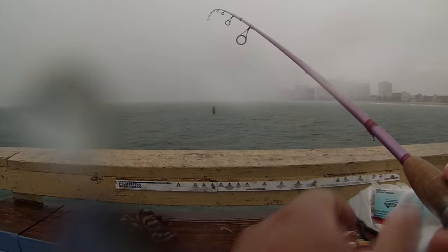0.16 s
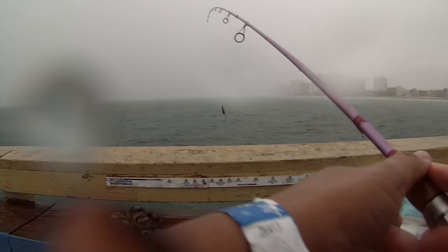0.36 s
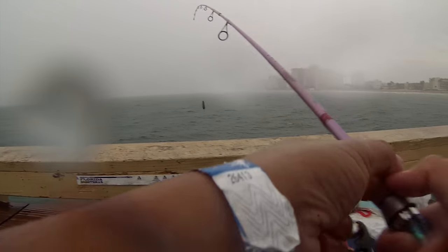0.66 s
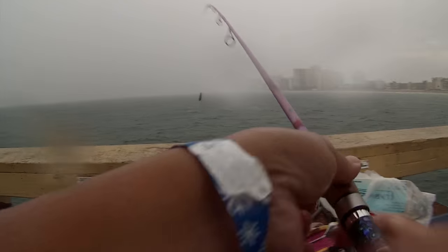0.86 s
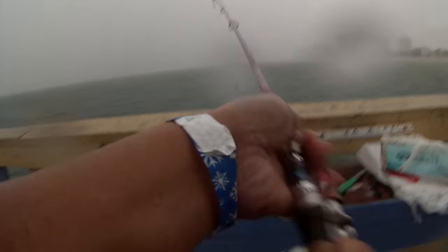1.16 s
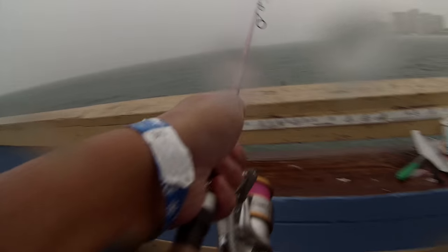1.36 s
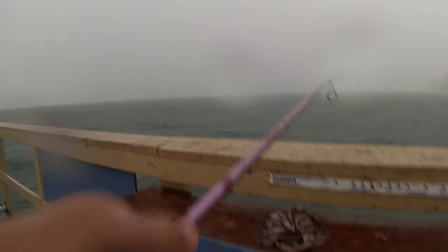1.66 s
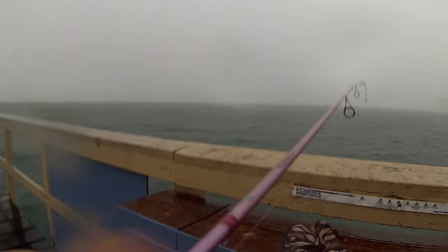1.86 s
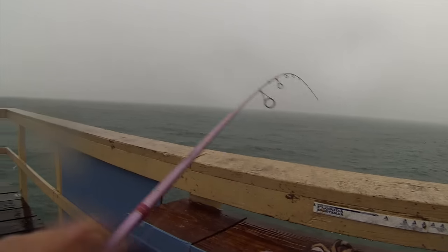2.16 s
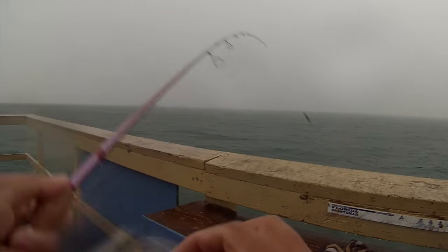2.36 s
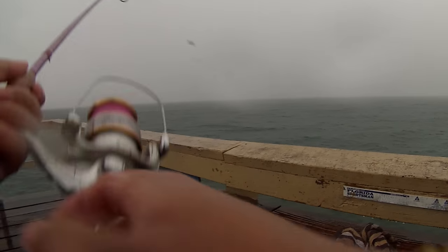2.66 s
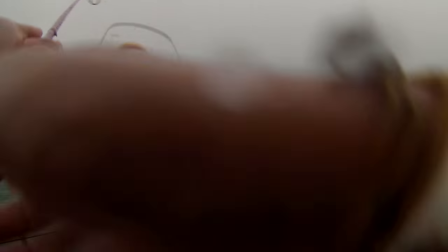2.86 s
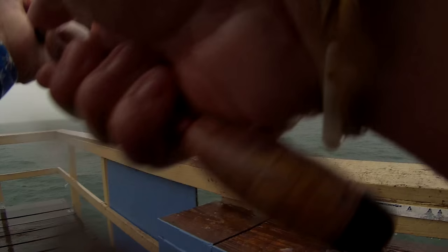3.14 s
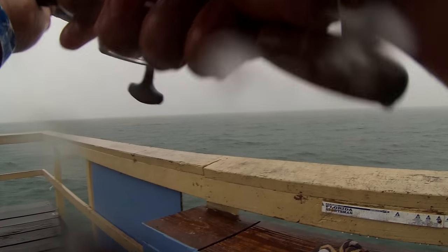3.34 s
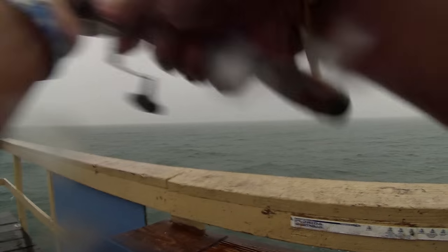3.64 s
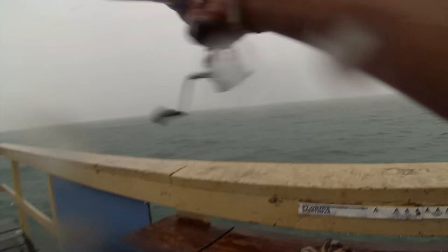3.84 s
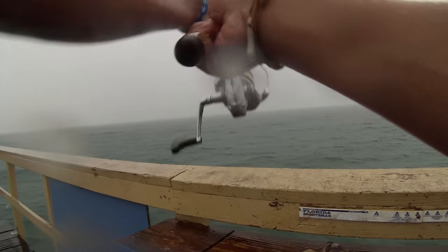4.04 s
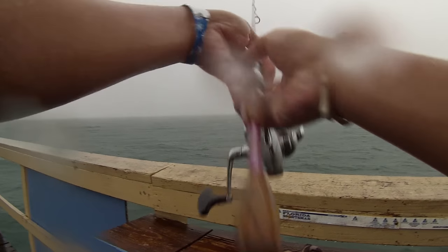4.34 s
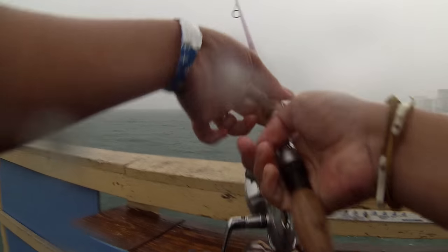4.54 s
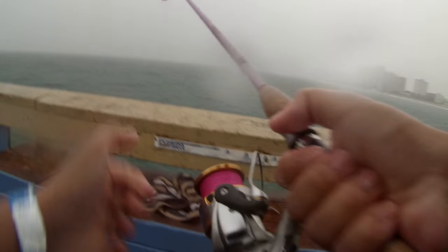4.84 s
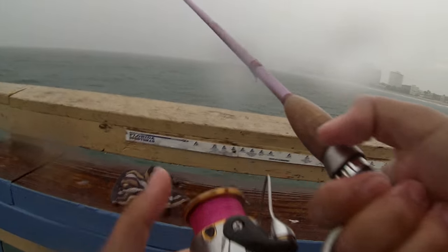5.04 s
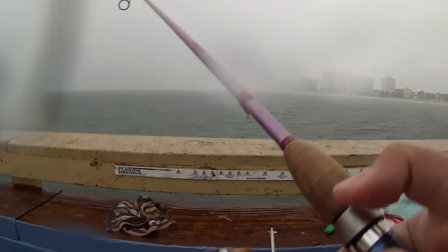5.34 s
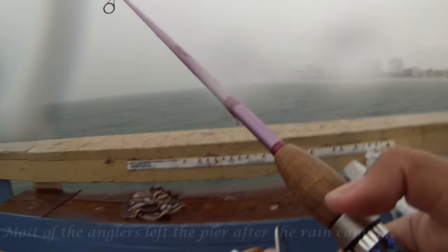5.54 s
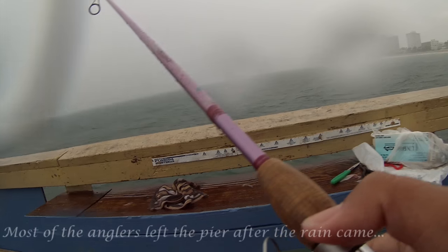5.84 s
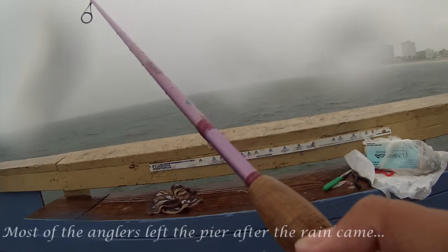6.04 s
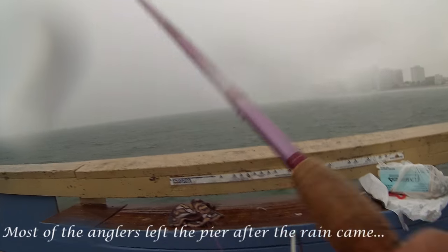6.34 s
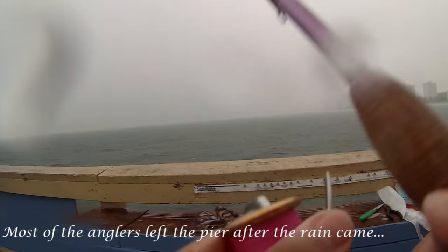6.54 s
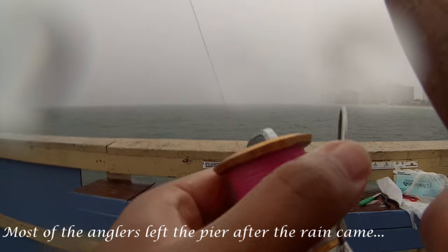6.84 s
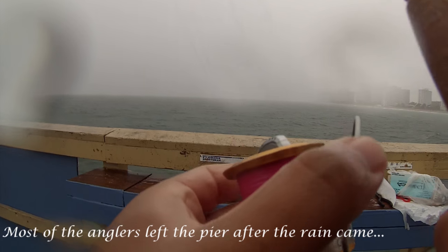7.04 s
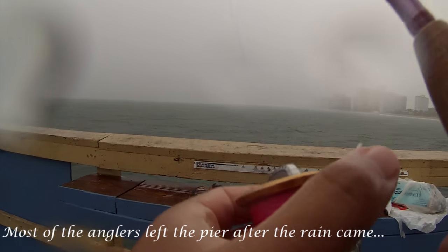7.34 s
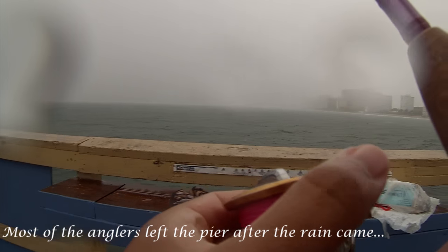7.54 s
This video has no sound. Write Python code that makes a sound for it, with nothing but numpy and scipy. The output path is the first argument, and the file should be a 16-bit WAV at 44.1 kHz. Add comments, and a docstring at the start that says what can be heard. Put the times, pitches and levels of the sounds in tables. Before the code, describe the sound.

Dense, irregular rain patter with hard, dry plastic clicks right at the microphone, a few hollow knocks, and low wind thumps behind.

```python
"""Drops tick and patter on a small sealed plastic housing, heard from inside it in heavy rain on a pier.
Each tick is a blow plus stirring droplets, ringing the damped modes of the shell; a few knocks sound hollow.
Behind them, shaped noise makes the downpour's faint wash through the walls and the rumble of the wind.
Dying low sines make soft thumps, and narrow noise makes a thin whine that fades in and out."""
import sys
import numpy as np
from scipy import signal
from scipy.io import wavfile
from scipy.ndimage import uniform_filter1d

SR = 44100
rng = np.random.default_rng(int(sys.argv[2]) if len(sys.argv) > 2 else 0)


def dump_mix(stems):
    """Bounce the given channels to the path in sys.argv[1] as a 16-bit WAV at rate SR."""
    frames = np.atleast_2d(stems).T  # one column per channel
    limited = np.clip(frames, -1, 1)  # hard clip at full scale
    pcm = np.round(limited * 32767).astype(np.int16)
    wavfile.write(sys.argv[1], SR, pcm)


N = 339129  # samples

# tone of the downpour through the walls: f/Hz, relative level/dB per Hz
WASH_COLOUR = [(150, -57), (250, -0.5), (566, -2.5), (2320, -3), (4490, -7.5), (6250, -13.5), (11700, -18),
               (14200, -24), (16000, -39)]
WASH_DB = -68  # rms level
# strength of the wind, which also drives the thumps: t/s, level/dB
WIND_LEVEL = [(0, -63.5), (2.2, -62.5), (3.4, -63), (3.75, -54), (4.15, -63.5), (7.69, -64.5)]
# tone of the wind: f/Hz, relative level/dB per Hz
WIND_COLOUR = [(10, -24), (22, -3.5), (90, -8), (250, -15), (500, -23.5), (900, -83)]
# fade of the whine: t/s, level/dB before its waver
WHINE_LEVEL = [(3.75, -98), (4.9, -78), (5.4, -78), (6.15, -83), (6.25, -104)]
WHINE_HZ, WHINE_WIDTH_HZ = 11640, 75
# hollow low knocks: t/s, f/Hz, nominal peak level/dB, t60/s
KNOCKS = [(3.608, 176, -28.5, 0.031), (4.833, 1090, -38.5, 0.026), (4.955, 1080, -34.5, 0.022),
          (7.571, 529, -30, 0.033)]
# modes of the shell in five groups (low, main, middle, upper, treble), before each hit varies them:
# f/Hz, level within the group/dB, t60/s
SHELL_MODES = [
    [(647, -6, 0.0079), (1036, 2.5, 0.0055)],
    [(1653, -6, 0.011), (1846, 8, 0.0052), (2250, -7.5, 0.017)],
    [(2655, 13.5, 0.004), (2747, -16, 0.04)],
    [(3412, 2.5, 0.0085), (3800, -7.5, 0.0065), (4480, -9.5, 0.017)],
    [(5440, -1, 0.0044), (7250, 0.5, 0.0029), (8440, 4, 0.0019), (10100, -1.5, 0.0018),
     (12700, -10.5, 0.0037)],
]
# usual colour of a small drop: relative level/dB of the low, main, middle, upper and treble groups
SMALL_DROP_COLOUR = [-4, -3.5, -5.5, -10, -11.5]
# strength of the small drops together: t/s, level/dB
PATTER_LEVEL = [(0, -64), (.35, -64), (.45, -62), (1.3, -63), (3.2, -60.5), (4.3, -62), (4.55, -57.5),
                (5.2, -63), (5.6, -57.5), (6.05, -60), (7.15, -65.5), (7.4, -57)]
PATTER_PER_S = 700  # small drops, on average
# large drops: t/s, then peak level/dB of the low, main, middle, upper and treble rings before the bass cut
LARGE_DROPS = [(0.1314, -38, -43, -25, -37, -32), (0.301, -54, -20.5, -48, -43, -38.5),
               (0.338, -54, -36, -37, -38, -27.5), (0.4447, -41.5, -42, -38, -45, -39.5),
               (0.4651, -41, -33, -40, -45, -40), (0.4883, -63, -37, -50, -38, -42),
               (0.5054, -35.5, -42, -47, -41, -32), (0.5093, -44, -29, -46, -29.5, -28),
               (0.5198, -42, -17, -21.5, -34, -22.5), (0.5394, -44, -23.5, -45, -50, -58),
               (0.542, -39, -33, -40, -54, -62), (0.5571, -35.5, -22, -22, -28, -33),
               (0.5752, -49, -30, -28.5, -52, -45), (0.6517, -34, -37, -36, -40, -37),
               (0.6567, -61, -41, -54, -40, -41), (0.6977, -43, -24, -34, -30.5, -41),
               (0.7027, -36, -28.5, -32, -48, -47), (0.7416, -60, -38.5, -39, -44, -41.5),
               (0.794, -33, -33.5, -33, -26.5, -27.5), (0.819, -35, -40, -46, -50, -60),
               (1.0526, -56, -33.5, -34, -33, -35.5), (1.3874, -37.5, -30.5, -28.5, -41, -41),
               (1.5784, -39, -57, -37.5, -51, -55), (1.6141, -36, -38.5, -45, -55, -60),
               (1.685, -42, -16, -45, -39, -27), (1.8298, -61, -33, -40, -37, -39),
               (1.9092, -33.5, -38, -23.5, -21, -29), (1.9796, -51, -43, -41, -37, -34),
               (1.984, -56, -43, -39, -38, -39), (2.0572, -57, -46, -38, -42, -42),
               (2.0843, -30.5, -27.5, -26, -34, -33.5), (2.1664, -36, -30, -29.5, -23, -26.5),
               (2.3, -27.5, -42, -59, -55, -62), (2.3216, -60, -58, -31, -31.5, -36),
               (2.4482, -67, -63, -32, -48, -43), (2.4525, -44, -38, -48, -29.5, -31),
               (2.5847, -46, -34.5, -32, -34.5, -29), (2.6193, -42, -37, -29, -38, -27.5),
               (2.6553, -50, -40, -32.5, -42, -42.5), (2.8316, -58, -14.5, -38, -27.5, -26),
               (2.8648, -27.5, -35, -54.5, -43, -46), (2.8723, -34, -26, -47, -21, -21),
               (2.8765, -48, -34, -26.5, -26, -34), (2.9378, -59, -38, -45, -38, -46),
               (2.9487, -23.5, -15, -16, -29, -20.5), (3.0188, -62, -50, -31, -32.5, -40),
               (3.032, -29.5, -34, -36, -44, -59), (3.114, -57.5, -45, -46, -34.5, -64),
               (3.1268, -54, -34.5, -33.5, -51, -36), (3.209, -39, -46, -22.5, -30, -29),
               (3.2525, -62, -54, -38, -47, -62), (3.3493, -39, -15.5, -31, -34, -33),
               (3.3558, -35, -9, -33, -28, -20), (3.3865, -39, -42, -25.5, -31, -27.5),
               (3.4249, -39, -35, -26.5, -57, -39), (3.4562, -48, -12.5, -16, -38, -27.5),
               (3.4626, -57, -28, -45, -35, -37), (3.5565, -54, -46, -45, -41, -38),
               (3.5651, -52, -33.5, -24.5, -30, -32.5), (3.6556, -42.5, -29, -32, -30.5, -26.5),
               (3.6699, -49, -46, -53, -36, -38), (3.7265, -43, -32, -33, -28.5, -34),
               (3.7562, -38, -22, -26, -36, -32), (3.7661, -32.5, -37, -38, -32, -28.5),
               (3.8988, -39, -36.5, -38, -39.5, -39.5), (4.0421, -52, -35, -63, -60, -53),
               (4.0594, -57, -49, -50, -37.5, -44), (4.131, -62, -38, -48, -39, -42),
               (4.1487, -28, -59, -16, -20.5, -17.5), (4.1603, -35, -23.5, -36, -49, -47),
               (4.2023, -31, -15.5, -24, -10.5, -9.5), (4.2045, -49, -30, -19, -47, -51),
               (4.2126, -39, -32, -42, -38, -46), (4.3459, -38, -30, -36, -30.5, -42),
               (4.363, -51, -40, -39, -42, -39), (4.4801, -50, -43, -37, -46, -39),
               (4.71, -47.5, -41.5, -45, -44, -53), (4.8146, -62, -33.5, -26, -38, -31.5),
               (4.9799, -42, -40.5, -48, -39.5, -40.5), (5.0346, -24, -7, -42, -32, -24.5),
               (5.0722, -51, -24.5, -25.5, -26, -31.5), (5.3901, -41, -38.5, -41, -72, -50),
               (5.434, -49, -50, -55, -42, -38.5), (5.5391, -81, -34, -32.5, -33, -33.5),
               (5.555, -40, -34, -49, -40, -41), (5.585, -57, -42, -36, -43, -34),
               (5.6656, -44, -37.5, -49, -38, -34), (5.7603, -43, -39, -38, -41.5, -54),
               (5.8658, -41, -39, -53, -51, -50), (6.1053, -48, -31.5, -38, -37.5, -42.5),
               (6.3397, -43, -20, -28, -23, -28.5), (6.3943, -39, -36, -39, -36, -41),
               (6.403, -43, -42, -31, -35.5, -32.5), (6.5408, -36, -29.5, -20.5, -22, -23.5),
               (6.5865, -43, -39, -42, -46, -39), (6.608, -54, -48, -40, -48, -41),
               (6.6857, -26.5, -27, -19, -26.5, -28.5), (6.8339, -45, -37.5, -39, -38.5, -34.5),
               (7.224, -40.5, -34, -34, -38, -33.5), (7.2698, -41, -55, -27.5, -36.5, -42),
               (7.3354, -29.5, -20.5, -14, -28, -10), (7.387, -36, -26.5, -32, -29.5, -31),
               (7.413, -56, -38, -49, -50, -47), (7.433, -33.5, -30.5, -44, -38, -37),
               (7.5046, -46.5, -43, -38, -47, -39), (7.5268, -40, -27.5, -27, -45, -40),
               (7.5429, -43, -25, -44, -26, -18), (7.5753, -32, -35, -43, -24.5, -36),
               (7.611, -56, -39, -58.5, -59, -54), (7.6161, -38, -32, -36.5, -53, -52),
               (7.6581, -46, -28, -37, -38, -35.5), (7.6857, -57, -31, -31, -32, -32.5)]
EDGE_HZ = 15350  # top of the band


def amp(db):
    """dB to gain."""
    return 10 ** (np.asarray(db) / 20)


def evened(x):
    """Scales to rms 1."""
    return x / np.sqrt(np.mean(x ** 2) + 1e-20)


def curve(rows):
    """A level table as a gain for every sample, gliding in dB."""
    s, db = np.transpose(rows)
    return amp(np.interp(np.arange(N) / SR, s, db))


def noise(colour, size, patchy_db, flicker_db):
    """Noise from random short-time spectra, with drifting patches and a flicker shared by all bins."""
    frames = N // (size // 4) + 5
    hz = np.fft.rfftfreq(size, 1 / SR)
    real, imag, patches = rng.standard_normal((frames, len(hz), 3)).T
    patches = uniform_filter1d(patches, size=8, axis=0)  # across frequency
    patches = evened(uniform_filter1d(patches, size=6, axis=1))  # across time
    flicker = rng.standard_normal(frames)
    f, db = np.transpose(colour)
    colour_db = np.interp(np.log(hz + 1), np.log(f + 1), db)[:, None]
    field_db = colour_db + patchy_db * patches + flicker_db * flicker
    spectra = (real + 1j * imag) * amp(field_db)
    sound = signal.istft(spectra, nperseg=size, noverlap=size * 3 // 4)[1]
    return evened(sound[:N])


def ring(hz, t60, t):
    """A dying sine that starts inward and swells with a time constant of about 0.6 cycle."""
    swell = 1 - np.exp(-1.6 * hz * t)
    return -np.sin(2 * np.pi * hz * t) * amp(-60 * t / t60) * swell


def wash():
    """The downpour through the walls: a steady average level with a strong, fast flicker."""
    return amp(WASH_DB) * noise(WASH_COLOUR, size=256, patchy_db=2.0, flicker_db=5.5)


def wind():
    """Wind rumble: low-weighted noise with slower, gentler flicker, following the wind level."""
    return curve(WIND_LEVEL) * noise(WIND_COLOUR, size=2048, patchy_db=2.2, flicker_db=2.2)


def whine():
    """A thin high tone: noise in a narrow resonance, fuzzy and wavering in strength."""
    pole = np.exp(-np.pi * WHINE_WIDTH_HZ / SR)
    fuzz = rng.standard_normal(N) + 1j * rng.standard_normal(N)
    fuzz = signal.lfilter([1 - pole], [1, -pole], fuzz)
    carrier = np.exp(2j * np.pi * WHINE_HZ * np.arange(N) / SR)
    waver_db = 3.0 * evened(uniform_filter1d(rng.standard_normal(N), size=3000))
    return curve(WHINE_LEVEL) * evened(amp(waver_db) * (fuzz * carrier).real)


def thumps():
    """Soft low bumps as water and gusts shove the whole housing: short dying sines at random moments."""
    t = np.arange(2500) / SR
    pitches_hz = np.geomspace(110, 600, 12)
    hits = rng.random(N) < 25 / SR  # about 25 bumps a second
    size = amp(4.3 * np.minimum(rng.exponential(1, N), 4)) * hits
    kind = rng.integers(0, len(pitches_hz), N)
    out = np.zeros(N)
    for k, hz in enumerate(pitches_hz):
        bump = ring(hz, 4.8 / hz, t)  # falls 60 dB in 4.8 cycles
        out += signal.oaconvolve(size * (kind == k), bump)[:N]
    return curve(WIND_LEVEL) * amp(-6.5) * evened(out)


def knocks():
    """Hollow low knocks: one dying sine each."""
    out, t = np.zeros(N + SR), np.arange(4000) / SR
    for s, hz, db, t60 in KNOCKS:
        out[round(s * SR):][:len(t)] += amp(db) * ring(hz, t60, t)
    return out[:N]


def ticks(rings_db, spot_db, splash_db, flip):
    """One tick a row: the spot hit sets how much each mode rings; the spreading water stirs them again."""
    t, out = np.arange(1800) / SR, 0
    for modes, ring_db in zip(SHELL_MODES, np.transpose(rings_db)):
        hz, db, t60 = np.transpose(modes)
        chance = rng.standard_normal((len(ring_db), 3, len(hz)))
        sign = np.sign(chance[:, 1] + flip)  # most modes start the same way
        share = amp(db + spot_db * chance[:, 0]) * sign
        tune = hz * (1 + 0.024 * chance[:, 2])
        rings = np.einsum("em,emt->et", share, ring(tune[..., None], t60[:, None], t))
        # cubed noise leaves sparse droplets, dying 60 dB in 20 ms
        stir = amp(splash_db - 60 * t / 0.02) * rng.standard_normal(rings.shape) ** 3
        stir[:, 0] = 1  # the blow itself
        rings = signal.fftconvolve(rings, stir, axes=1)[:, :len(t)]
        peak = abs(signal.hilbert(rings)).max(1, keepdims=True)
        out = out + amp(ring_db)[:, None] * rings / peak
    bass_cut = signal.butter(2, 420, "high", fs=SR)  # the small stiff shell passes little bass
    return signal.lfilter(*bass_cut, out)


def small_drops(count=64):
    """Many small drops of widely spread size, each on one of many spots; the wet film damps their ring."""
    colours_db = SMALL_DROP_COLOUR + 4.9 * rng.standard_normal((count, 5))
    splash_db = -26 + 4.6 * rng.standard_normal((count, 1))  # some tap, some splatter
    bank = ticks(colours_db, spot_db=8.5, splash_db=splash_db, flip=0.38)
    bank = bank * amp(-60 * np.arange(bank.shape[1]) / SR / 0.033)  # film: a further 60 dB in 33 ms
    hits = rng.random(N) < PATTER_PER_S / SR
    size = amp(7.37 * np.minimum(rng.exponential(1, N), 4.5)) * hits
    spot = rng.integers(0, count, N)
    out = np.zeros(N)
    for k, tick in enumerate(bank):
        out += signal.oaconvolve(size * (spot == k), tick)[:N]
    return curve(PATTER_LEVEL) * evened(out)


def large_drops():
    """Drops that stand out, each at its moment: strong blows with a faint splash, ringing the shell."""
    rows, out = np.array(LARGE_DROPS), np.zeros(N + SR)
    bank = ticks(rows[:, 1:], spot_db=3.5, splash_db=-41, flip=1.2)
    for s, tick in zip(rows[:, 0], bank):
        out[round(s * SR):][:len(tick)] += tick
    return out[:N]


def scene():
    """Wash, wind, whine and thumps under knocks and drops, in one channel."""
    background = wash() + wind() + whine() + thumps()
    drops = knocks() + small_drops() + large_drops()
    return (background + drops)[None]


def record(dry):
    """The band limit: a steep low-pass that removes the extreme treble."""
    low_pass = signal.firwin(127, EDGE_HZ, window=("kaiser", 9), fs=SR)
    return signal.oaconvolve(dry, low_pass[None], "same")


dry = scene()
out = record(dry)
dump_mix(out)
```